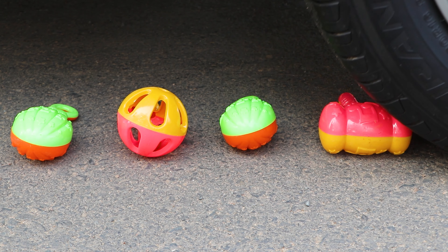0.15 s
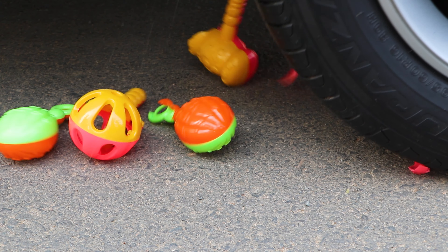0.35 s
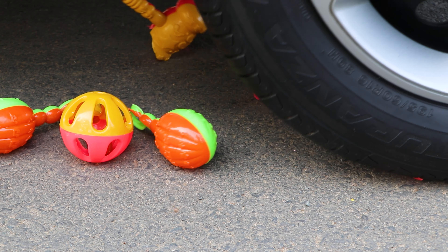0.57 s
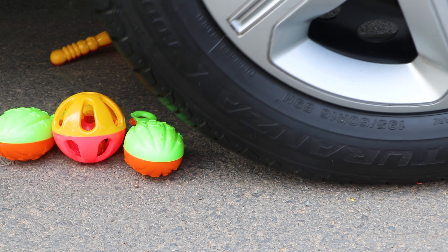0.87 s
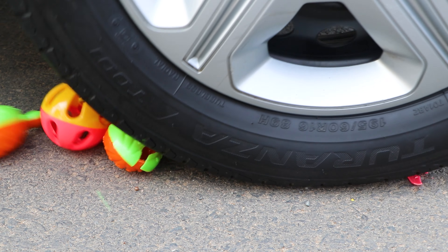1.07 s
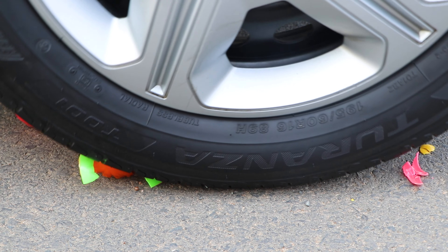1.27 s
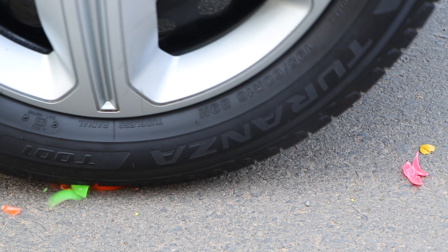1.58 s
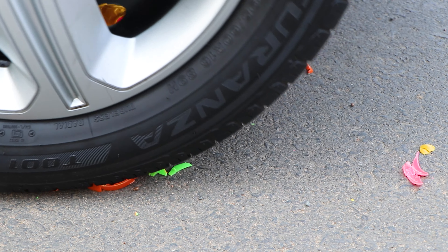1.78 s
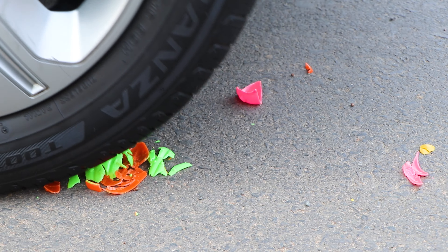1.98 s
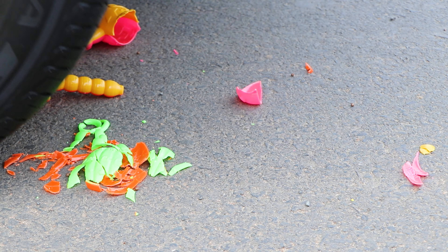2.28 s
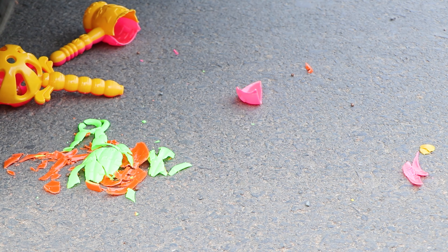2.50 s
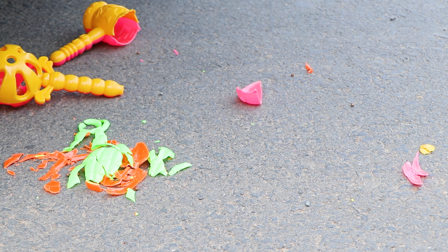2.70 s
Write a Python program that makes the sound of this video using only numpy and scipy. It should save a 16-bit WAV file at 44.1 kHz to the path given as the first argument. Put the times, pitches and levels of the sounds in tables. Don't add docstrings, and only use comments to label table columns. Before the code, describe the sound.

Hollow plastic rattles are crushed by a car tyre on asphalt, heard very close. After near quiet, the first bursts sharply at 0.2 s, followed by dense clattering and bead chatter. Scrapes and short creaks thin out until loud cracks around 1.1 s. Crunching snaps continue to 1.75 s, a hard hollow thud hits at 1.9 s, pops follow from 2.1 s, then sparse ticks fade over a faint idle.

```python
import sys
import numpy as np
from scipy import signal
from scipy.io import wavfile

SR = 44100
rng = np.random.default_rng(int(sys.argv[2]) if len(sys.argv) > 2 else 0)


def to_wav(sig):
    pcm = np.clip(np.atleast_2d(sig), -1, 1) * 32767
    pcm = np.round(pcm).astype(np.int16)
    wavfile.write(sys.argv[1], SR, pcm.T)


def rack_gain(trim_db):
    fader = np.asarray(trim_db, float)
    return 10 ** (fader / 20)


N = 125685


def curve(rows):
    return np.interp(np.arange(N) / SR, *np.transpose(rows))


def unit(x):
    return x / np.sqrt(np.mean(x ** 2) + 1e-20)


def band(x, low_hz, high_hz, order=2):
    return signal.sosfilt(signal.butter(order, [low_hz, high_hz], "band", fs=SR, output="sos"), x)


def ring(x, hz, t60):
    r, w = rack_gain(-60 / (t60 * SR)), 2 * np.pi * hz / SR
    return signal.lfilter([0, np.sin(w)], [1, -2 * r * np.cos(w), r * r], x + 1e-18)


def grains(per_s, spread_db):
    size = rack_gain(spread_db * np.minimum(rng.exponential(1, N), 4)) * rng.choice([-1, 1], N)
    return unit(size * (rng.random(N) < per_s / SR))


def breaks(tear, s, db, crack_t60, tail_t60, tail_db, hit_db):
    hits = np.full(N, 1e-18)
    np.add.at(hits, (s * SR).astype(int), rack_gain(db))

    def dying(t60):
        return signal.lfilter([1], [1, -rack_gain(-60 / (t60 * SR))], hits)

    tearing = dying(crack_t60) + rack_gain(tail_db) * dying(tail_t60)
    return tear * tearing + rack_gain(hit_db) * hits


# (frequency [Hz], level [dB per Hz])
STREET_SPECTRUM = [(18, -49), (30, -27.5), (106, -11), (259, -11), (512, -8.5), (760, -5.5), (2540, -6.5),
                   (16000, -58.5)]
# (time [s], level [dB])
STREET_LEVEL = [(0, -64), (1.9, -59.5), (2.1, -73.5), (2.6, -78), (2.85, -83)]


def street():
    out = 0
    edges = 30 * 2 ** np.arange(0, 9.1, .5)
    white = rng.standard_normal((2, N))
    hz, db = np.transpose(STREET_SPECTRUM)
    for k, (low, high) in enumerate(zip(edges, edges[1:])):
        level_db = np.interp(np.log(low * high) / 2, np.log(hz), db)
        out = out + band(white[k % 2], low, high) * rack_gain(level_db)
    return unit(out) * rack_gain(curve(STREET_LEVEL))


# (time [s], level [dB])
AGITATION = [(.15, -63), (.3, -39), (.36, -48), (.39, -28), (.47, -18), (.52, -33.5), (.6, -23.5),
             (.7, -29), (.84, -39.5), (.9, -40), (1.07, -25), (1.18, -33.5), (1.3, -34), (1.8, -59),
             (2.085, -79), (2.115, -27), (2.3, -70.5), (2.85, -89)]


def stirring():
    clumps = unit(signal.lfilter([1], [1, -1.994, .994009], rng.standard_normal(N)))
    return clumps, rack_gain(curve(AGITATION) + 2.5 * clumps)


# (frequency [Hz], level [dB], t60 [s])
WALL_MODES = [(2140, 2.5, 0.0046), (2810, -3.5, 0.0037), (2950, -5.5, 0.01), (3215, 1, 0.011),
              (3500, 7, 0.0038), (3938, -3, 0.012), (4260, -0.5, 0.0044), (4710, -6.5, 0.0096),
              (5240, -10, 0.0055), (6040, -16.5, 0.0054), (6250, -18, 0.0067)]


def walls(tear, s, snap_db, wall_hz, clumps, stir):
    out = 0
    for k, (hz, db, t60) in enumerate(WALL_MODES):
        colour_db = 2.5 - 6 * (np.log2(hz / wall_hz) / .45) ** 2
        colour_db = np.pad(colour_db, (0, len(s) - len(wall_hz)))
        hit_level_db = snap_db + colour_db - 29.5 + rng.normal(0, 2, len(s))
        drive = rack_gain(db) * breaks(np.roll(tear, 1000 * k), s, hit_level_db,
                                 crack_t60=0.0052, tail_t60=0.094, tail_db=-14, hit_db=11)
        bead_db = -29.5 + 4.5 * np.roll(clumps, 9000 * k) - 10 * (np.log2(hz / 4550) / .38) ** 2
        drive += rack_gain(bead_db) * stir * grains(2300 / 8, 2.5)
        out = out + (-1) ** k * ring(drive, hz, t60)
    return band(out, 1400, 6190, order=4)


def splinters(tear, s, air_db, stir):
    top = breaks(tear, s, air_db - 1, crack_t60=0.017, tail_t60=0.11, tail_db=-16, hit_db=-9)
    top += rack_gain(-35.5) * stir * grains(2300 * 3, 3.8)
    return band(top, 9400, 14700, order=3)


def shells(tear, s, shell_db, shell_hz):
    out = 0
    for k, hz in enumerate(np.geomspace(260.8, 1988, 14)):
        off = np.log2(hz / shell_hz)
        near_db = -6 * (off / np.where(off > 0, 0.66, 0.47)) ** 2
        level_db = shell_db + near_db - 18.5 + rng.normal(0, 2, len(s))
        drive = breaks(np.roll(tear, 1000 * k), s, level_db,
                       crack_t60=0.0089, tail_t60=0.12, tail_db=-12.5, hit_db=1)
        drive = band(drive, hz / 1.4, hz * 1.6)
        out = out + np.sqrt(hz / 1000) * ring(drive, hz, 7.2 / hz)
    return band(out, 120, 4500)


# (time [s], snap peak [dB], splinter level [dB], struck wall pitch [Hz])
BURST = [(0.151, -37, -72.5, 3500), (0.197, -37.5, -50, 3300), (0.2171, -5.5, -22.5, 2973),
         (0.2243, -7.5, -40, 4200), (0.2438, 0.5, -24, 3580), (0.2814, -16.5, -47, 3030),
         (0.2915, -17.5, -45, 3080), (0.3516, -25.5, -60.5, 4720), (0.3754, -24, -70, 3520),
         (0.3816, -14, -51.5, 3200), (0.385, -22.5, -49, 3240), (0.4072, -12.5, -44.5, 2780),
         (0.423, -11, -39, 4560), (0.438, -10.5, -38, 4440), (0.455, -8.5, -47, 2200),
         (0.482, -5, -35.5, 2690), (0.523, -14, -50.5, 4400), (0.539, -16, -54, 3400),
         (0.55, -14.5, -54, 3780), (0.566, -15, -58, 2770), (0.586, -17, -53.5, 4800),
         (0.5986, -20, -39.5, 4100)]
SHOVE = [(0.6367, -31, -45, 4840), (0.648, -10.5, -39.5, 2100), (0.6707, -25, -49, 3590),
         (0.684, -12, -51, 5000), (0.698, -44, -54.5, 4600), (0.726, -22.5, -52, 5100),
         (0.7514, -31.5, -52.5, 4360), (0.754, -10.5, -44, 3150), (0.7766, -41, -54.5, 3580),
         (0.7932, -22, -56.5, 4500), (0.8582, -19, -61, 4130), (0.871, -11, -53.5, 3200),
         (0.9311, -25.5, -76.5, 4360), (0.948, -22.5, -80, 4500), (0.962, -27, -78, 4630),
         (0.9777, -28, -84.5, 4260), (0.994, -31, -84, 4630), (1.001, -22, -69.5, 3310),
         (1.0218, -19.5, -71.5, 4640), (1.0445, -20.5, -66.5, 4170), (1.0622, -18.5, -53.5, 4086),
         (1.08, -20.5, -55.5, 4210), (1.0967, -1.5, -22.5, 4500), (1.1087, 2, -25.5, 4600),
         (1.1272, -8.5, -24.5, 3800), (1.156, -39.5, -47, 4620), (1.179, -32, -45.5, 4360),
         (1.197, -22.5, -80.5, 3980), (1.2085, -13.5, -42, 4330)]
# (time [s], snap peak [dB], splinter level [dB], shell level [dB], broken shell pitch [Hz])
CRUSH = [(1.2378, -8.5, -33, -18, 1561), (1.256, -19, -33, -15.5, 1480), (1.276, -9, -33, -24.5, 1680),
         (1.3007, -28, -45.5, -30.5, 1410), (1.313, -15, -41.5, -20, 2030), (1.3334, -9, -32.5, -26, 698),
         (1.3582, -18.5, -39.5, -28.5, 1830), (1.3804, -12.5, -38, -25, 2060),
         (1.4051, -11, -31.5, -25, 1560), (1.4198, -59, -37.5, -32, 1360), (1.4643, -18, -44.5, -26, 1610),
         (1.4862, -16, -36, -21.5, 660), (1.51, -12, -37, -28.5, 1093), (1.5371, -10.5, -40.5, -20, 1300),
         (1.5667, -12.5, -38, -21, 667), (1.6195, -10.5, -41.5, -23.5, 1640),
         (1.664, -16, -50.5, -23.5, 740), (1.676, -9.5, -31, -18.5, 970), (1.709, -39, -50.5, -19.5, 1140)]
RELEASE = [(1.7642, -12.5, -42.5, -17.5, 1300), (1.782, -37, -60.5, -36, 1180),
           (1.8582, -17, -55, -18, 1120), (1.903, -10.5, -61, -16, 618), (2.1258, -6, -43, -16.5, 1300),
           (2.1374, -12.5, -37, -21, 750), (2.2146, -25.5, -68, -40, 1390),
           (2.2207, -15.5, -55, -28.5, 435), (2.2461, -15, -50.5, -20, 1200),
           (2.2724, -11, -46.5, -26, 475), (2.33, -35, -76, -36, 1500), (2.3551, -17.5, -58.5, -12.5, 1004),
           (2.4301, -40, -69, -21.5, 1436), (2.5065, -29.5, -77, -36.5, 1900),
           (2.5148, -31, -62, -27.5, 1440), (2.522, -30, -76.5, -39, 1800), (2.549, -51, -86, -57, 1830),
           (2.5332, -32, -83, -53, 1734), (2.5778, -27, -88.5, -28, 1500), (2.652, -46, -70.5, -50.5, 1803)]


def plastic():
    s, snap_db, air_db = np.transpose([row[:3] for row in BURST + SHOVE + CRUSH + RELEASE])
    wall_hz = np.transpose(BURST + SHOVE)[3]
    late_s, _, _, shell_db, shell_hz = np.transpose(CRUSH + RELEASE)
    clumps, stir = stirring()
    tear = grains(9000.0, 3.5)
    wall = walls(tear, s, snap_db, wall_hz, clumps, stir)
    hiss = splinters(tear, s, air_db, stir)
    return wall + hiss + shells(tear, late_s, shell_db, shell_hz)


# (time [s], length [s], level [dB])
CREAKS = [(0.213, 0.0038, -34.5), (0.242, 0.011, -23.5), (0.266, 0.04, -39), (0.375, 0.024, -35.5),
          (0.39, 0.019, -54), (0.43, 0.024, -37), (0.495, 0.0095, -37), (0.523, 0.024, -33.5),
          (0.589, 0.0014, -23.5), (0.756, 0.0028, -34), (0.776, 0.02, -45), (0.871, 0.017, -27),
          (0.957, 0.043, -43), (1, 0.0044, -29), (1.044, 0.022, -36.5), (1.082, 0.032, -37.5),
          (1.128, 0.0054, -21), (1.142, 0.018, -40)]
# (frequency [Hz], level [dB], t60 [s])
CREAK_MODES = [(750, -25.5, 0.023), (902, -26.5, 0.033), (1036, -12.5, 0.045), (1140, 1, 0.02),
               (1300, -3, 0.0097), (1645, -0.5, 0.015)]


def creaks():
    t, held, t60_s = np.arange(N) / SR, np.zeros(N), .06
    for s, length, db in CREAKS:
        held += (t >= s) * rack_gain(db - 60 * np.maximum(t - s - length, 0) / t60_s)
    slips = held * grains(2500, 2.5)
    groan = sum(rack_gain(db - 23.5) * ring(slips, hz, t60) for hz, db, t60 in CREAK_MODES)
    return band(groan, 732, 1700, order=3)


# (time [s], thud level [dB], hum level [dB])
JOLTS = [
    (.217, -39, -60),
    (.246, -49, -47),
    (1.13, -59.5, -63),
    (1.761, -36.5, -58.5),
    (1.906, -5.5, -54),
    (2.124, -54, -55.5),
    (2.357, -52.5, -56.5),
]
# (frequency [Hz], level [dB], t60 [s])
TYRE_AIR = [(220, 4.5, 0.77), (690, 10.5, 0.26), (940, -4, 0.65)]


def tyre():
    s, thud_db, hum_db = np.transpose(JOLTS)
    kicks = np.zeros((2, N))
    kicks[:, (s * SR).astype(int)] = rack_gain(np.array([thud_db, hum_db]))
    out = ring(band(kicks[0], 60, 900), 150, 0.0044)
    for hz, db, t60 in TYRE_AIR:
        out = out + rack_gain(db - 7) * ring(band(kicks[1], hz / 1.06, hz * 1.06), hz, t60)
    return out


# (time [s], pulse level [dB], pulse pitch [Hz], edge level [dB])
POPS = [(0.592, -28, 1120, -60), (0.7545, -16.5, 2380, -45), (1.1278, -18, 856, -45),
        (1.2575, -20.5, 1460, -53), (1.538, -19, 970, -67), (1.596, -35, 3000, -50),
        (1.647, -33, 1990, -45), (1.667, -17.5, 2160, -40), (1.7088, -15, 1130, -61),
        (1.7465, -36, 3500, -60), (1.7534, -30, 3200, -40), (1.7645, -13, 1870, -18.5),
        (1.7809, -13.5, 1710, -37), (1.8584, -14.5, 1620, -38), (1.9037, -7, 1100, -17.5),
        (2.126, -12, 1530, -28), (1.238, -26.5, 1400, -51), (2.272, -14.5, 1440, -44.5),
        (2.2983, -27.5, 2500, -50), (2.3541, -13.5, 1460, -47), (2.431, -34, 1400, -71),
        (2.5785, -20, 1410, -80), (2.615, -46, 1930, -71), (2.776, -57, 3030, -94.5)]


def pops():
    out = np.zeros(N + 900)
    t = np.arange(900) / SR
    edge = np.sin(2 * np.pi * 8370 * t) + rack_gain(-9.5) * np.sin(2 * np.pi * 13500 * t)
    edge = band(rack_gain(-60 * t / 0.0023) * edge, 5000, 16000)
    for s, db, hz, edge_db in POPS:
        fall = rack_gain(db + 5 - 60 * t * hz / 5.0)
        pulse = band(fall * np.sin(2 * np.pi * hz * t), hz / 1.8, 6500, order=3)
        out[int(s * SR):][:len(t)] += pulse + rack_gain(edge_db) * edge
    return out[:N]


def scene():
    return (street() + plastic() + creaks() + tyre() + pops())[None]


def low_pass(x):
    return signal.sosfilt(signal.butter(12, 16820, fs=SR, output="sos"), x)


def record(dry):
    limit = .3
    held = dry / (1 + np.abs(dry / limit) ** 6) ** (1 / 6)
    return low_pass(held)


dry = scene()
out = record(dry)
to_wav(out)
```